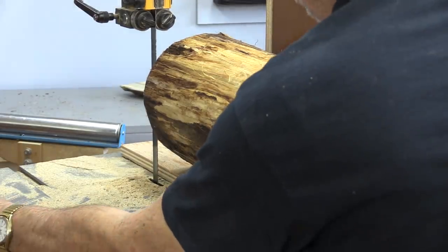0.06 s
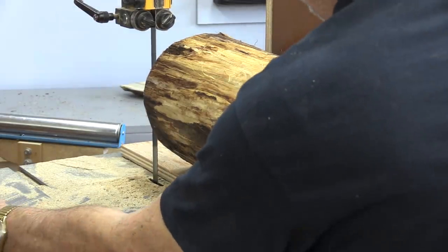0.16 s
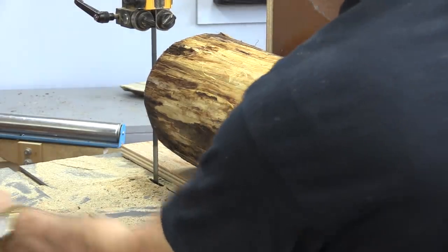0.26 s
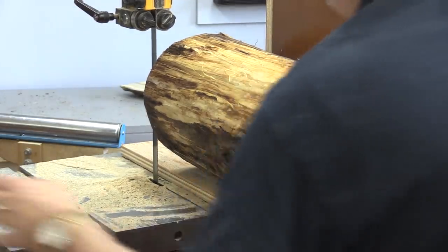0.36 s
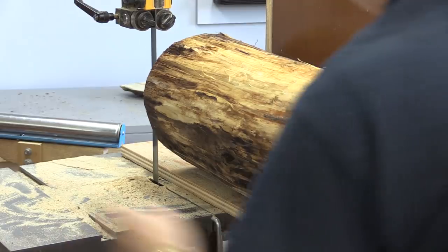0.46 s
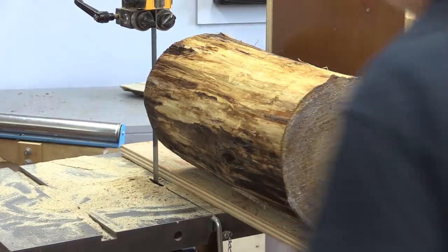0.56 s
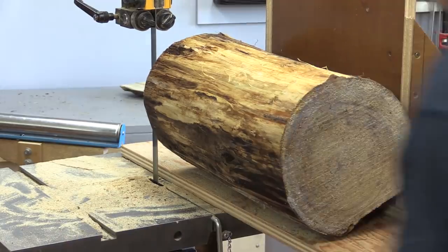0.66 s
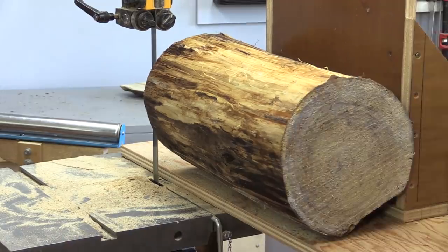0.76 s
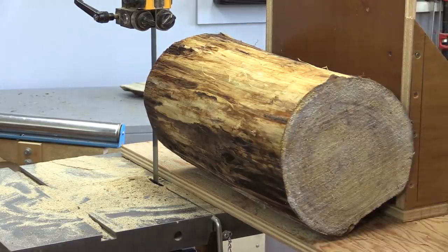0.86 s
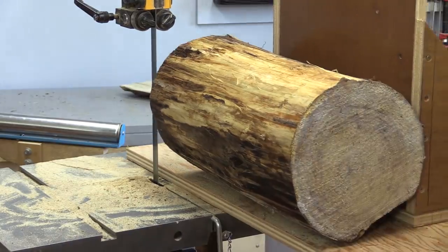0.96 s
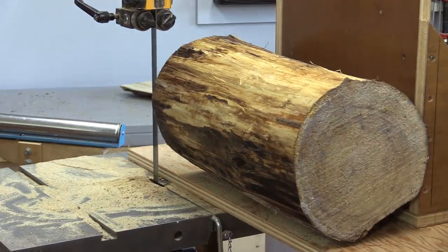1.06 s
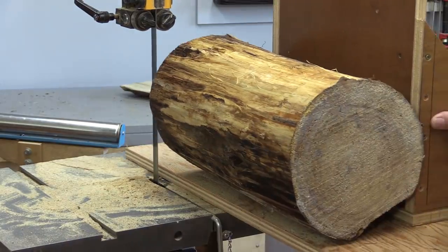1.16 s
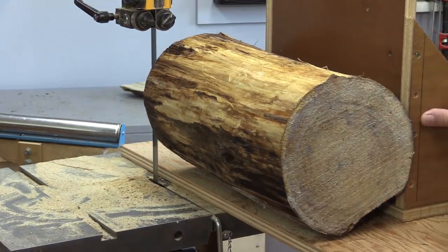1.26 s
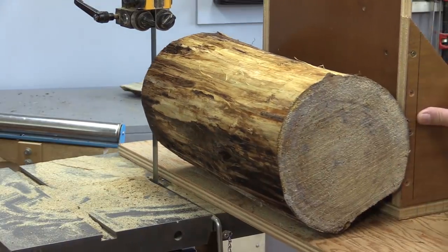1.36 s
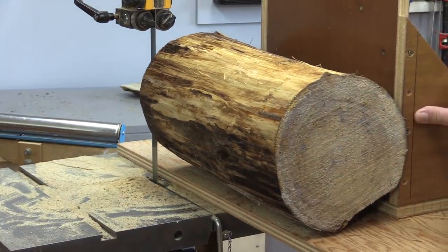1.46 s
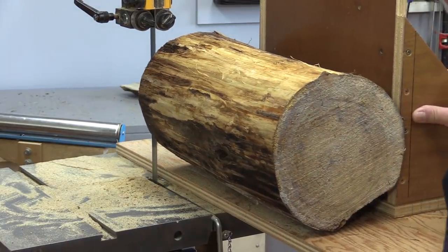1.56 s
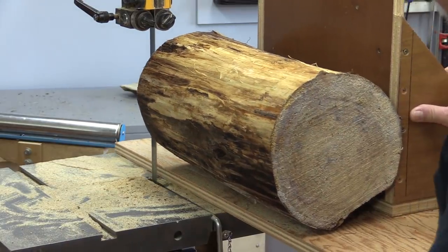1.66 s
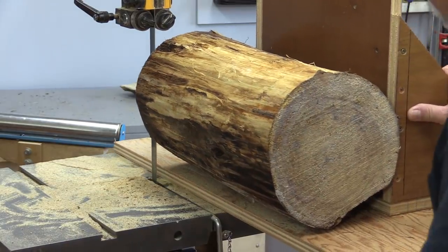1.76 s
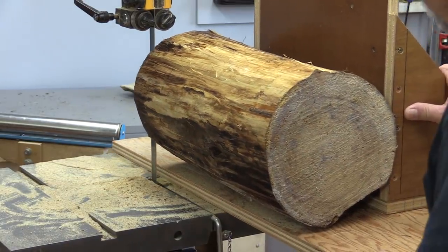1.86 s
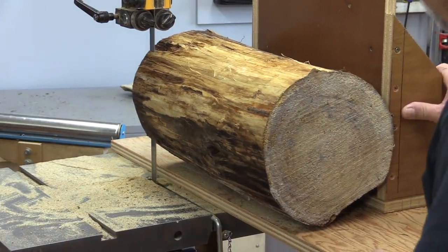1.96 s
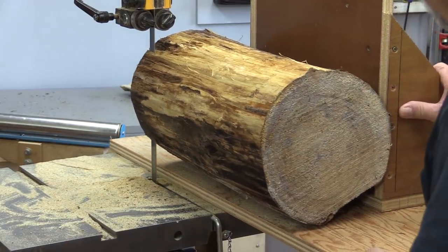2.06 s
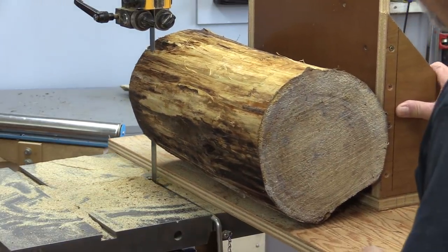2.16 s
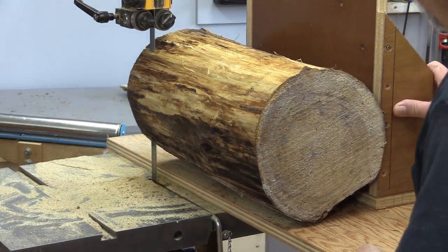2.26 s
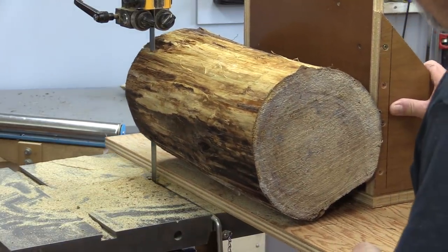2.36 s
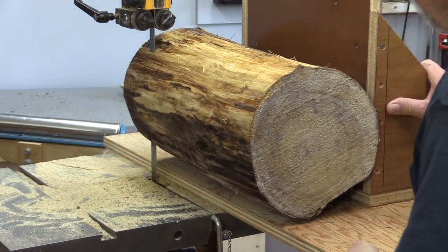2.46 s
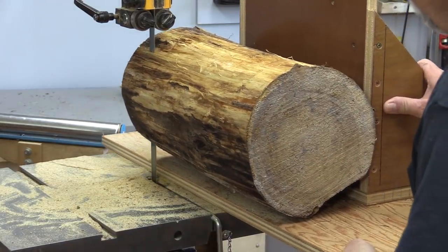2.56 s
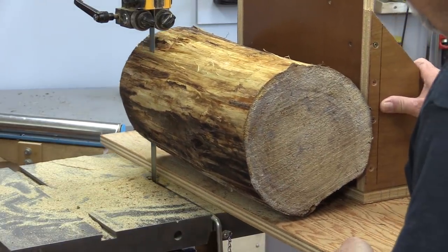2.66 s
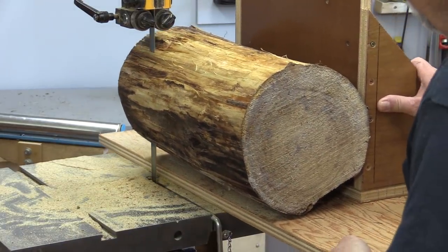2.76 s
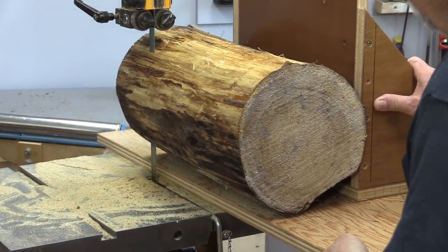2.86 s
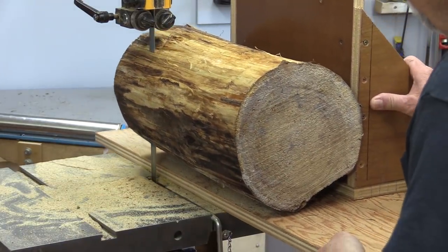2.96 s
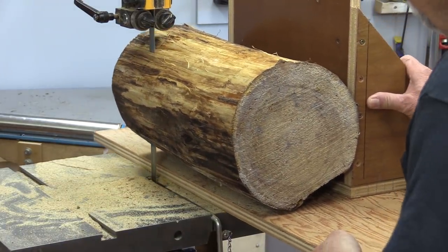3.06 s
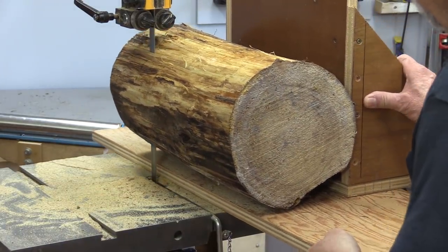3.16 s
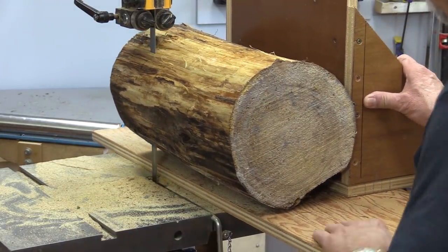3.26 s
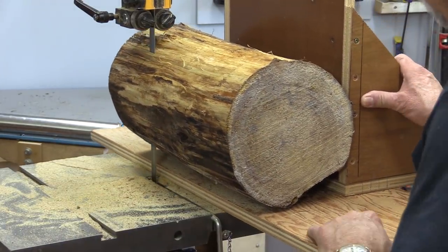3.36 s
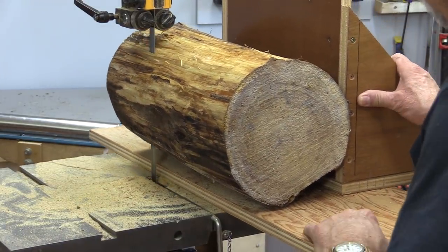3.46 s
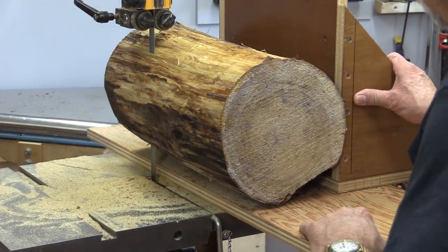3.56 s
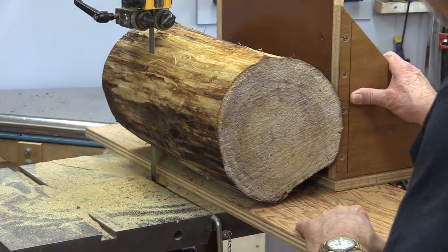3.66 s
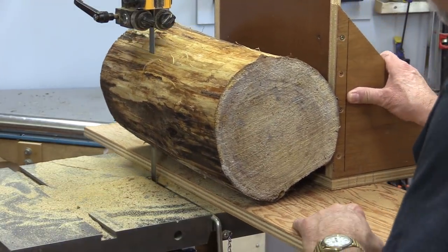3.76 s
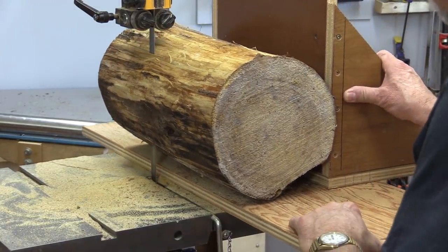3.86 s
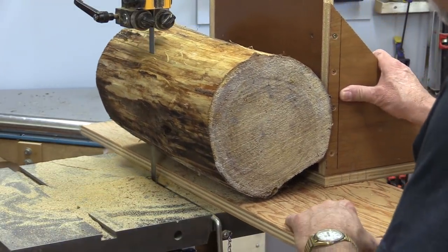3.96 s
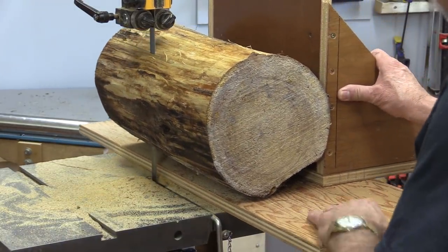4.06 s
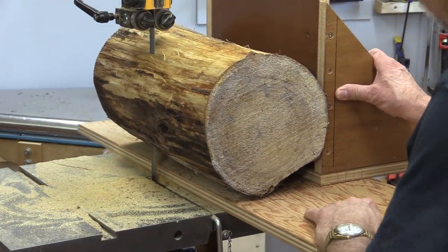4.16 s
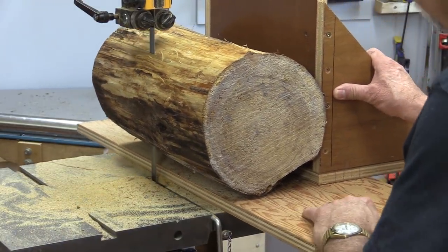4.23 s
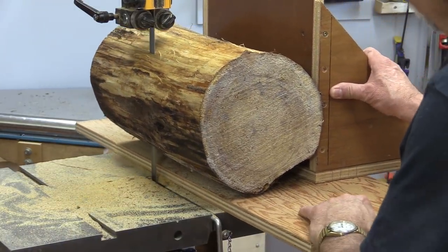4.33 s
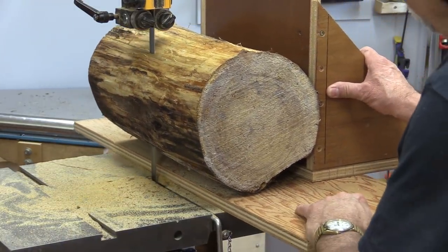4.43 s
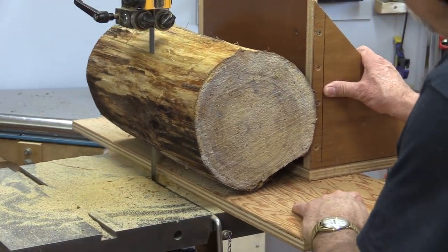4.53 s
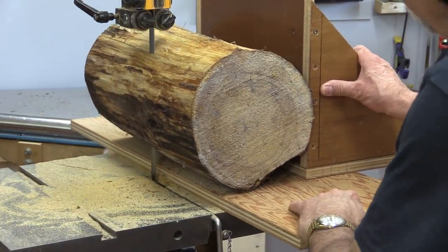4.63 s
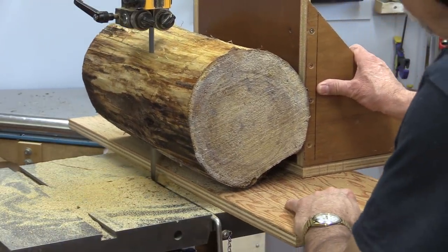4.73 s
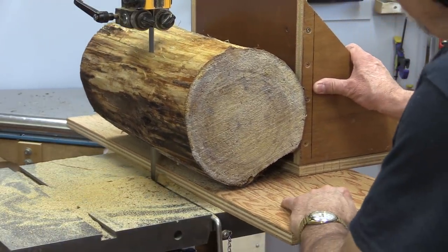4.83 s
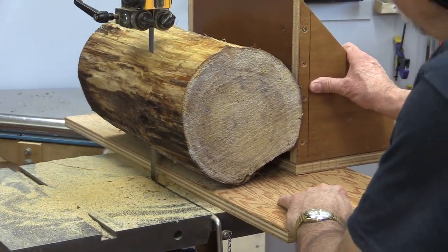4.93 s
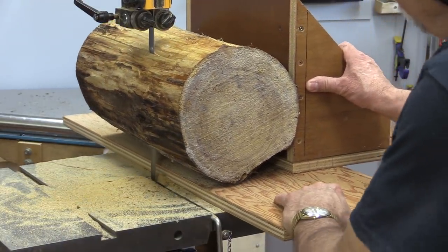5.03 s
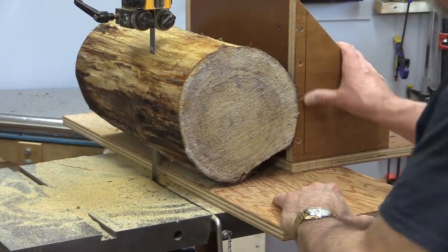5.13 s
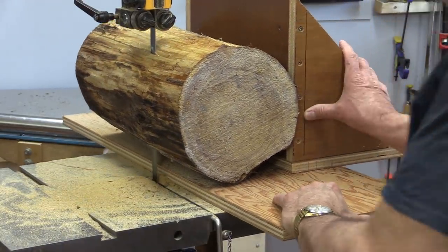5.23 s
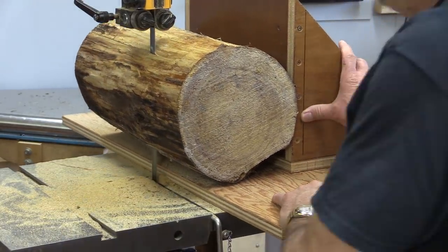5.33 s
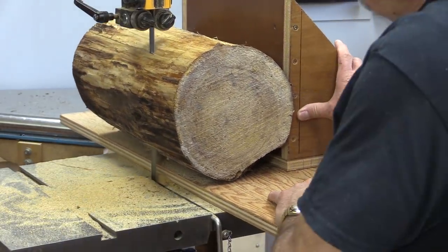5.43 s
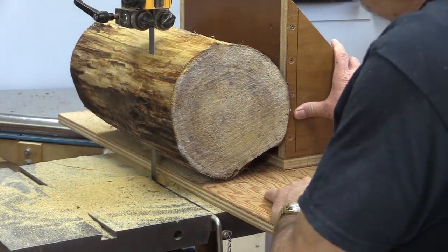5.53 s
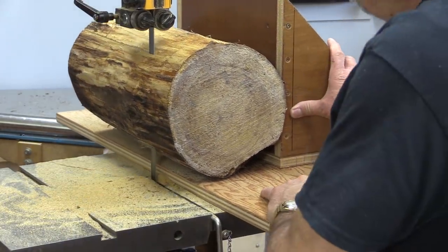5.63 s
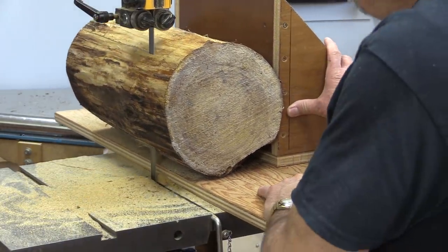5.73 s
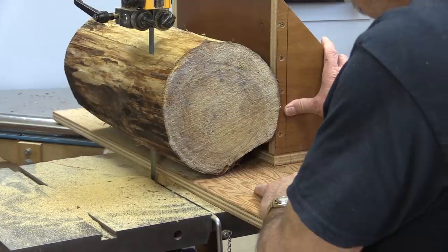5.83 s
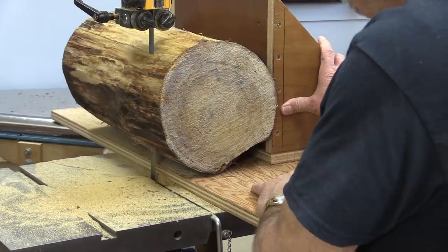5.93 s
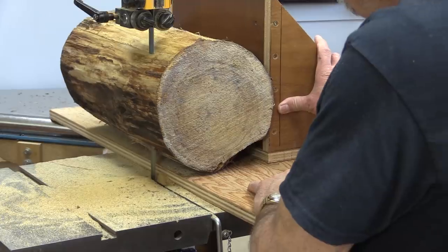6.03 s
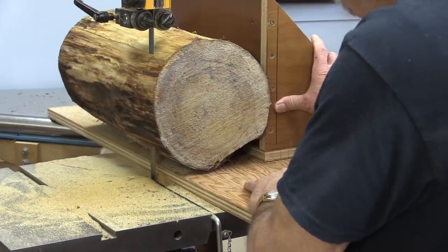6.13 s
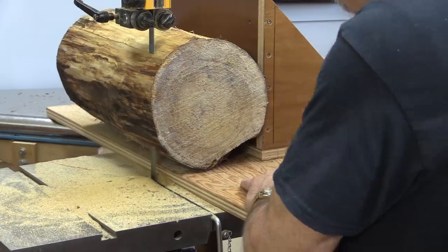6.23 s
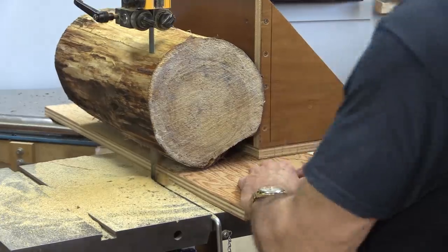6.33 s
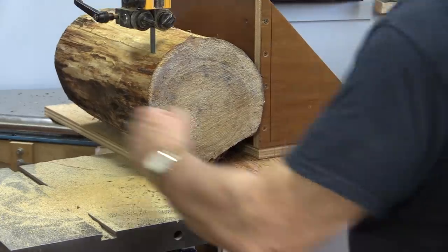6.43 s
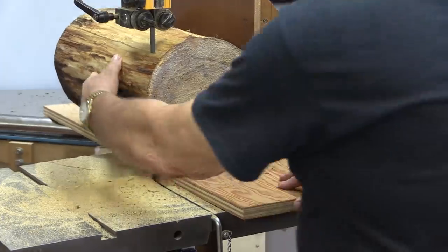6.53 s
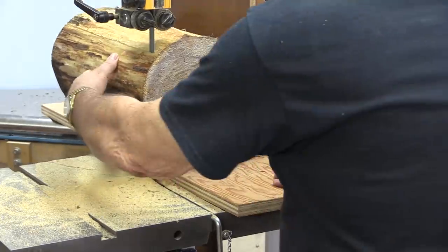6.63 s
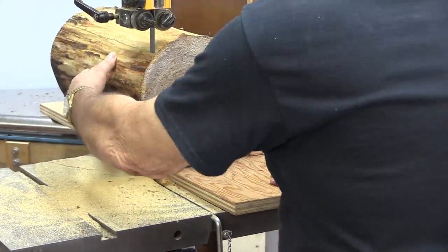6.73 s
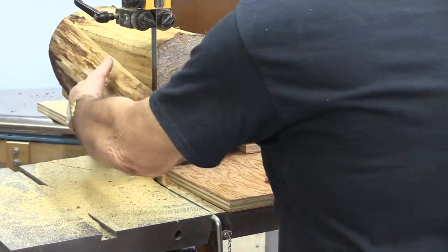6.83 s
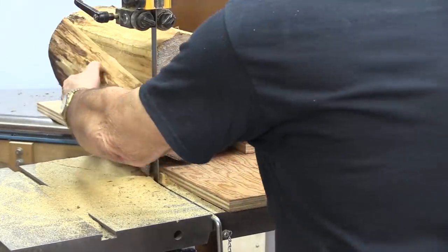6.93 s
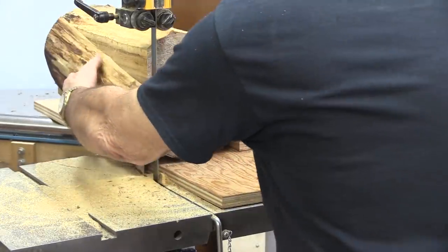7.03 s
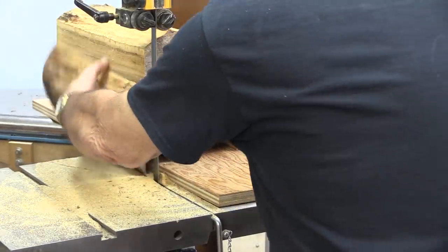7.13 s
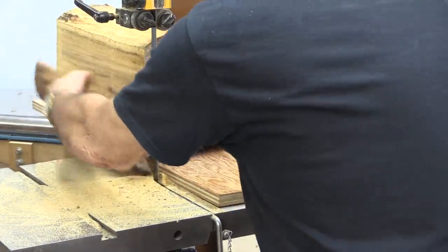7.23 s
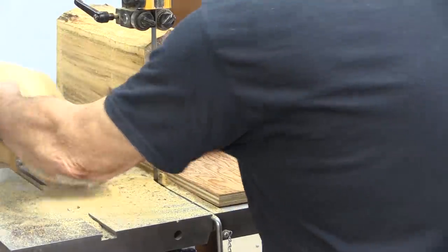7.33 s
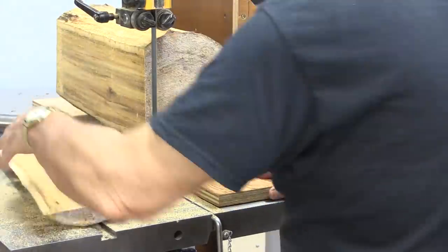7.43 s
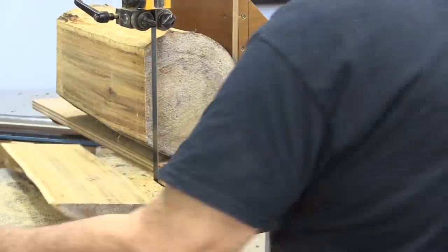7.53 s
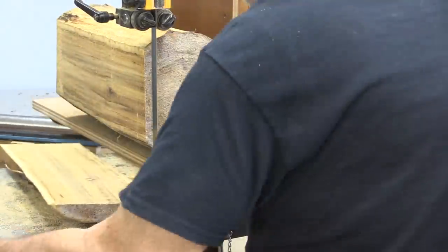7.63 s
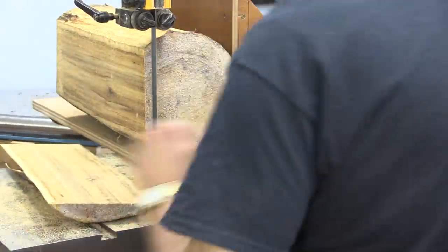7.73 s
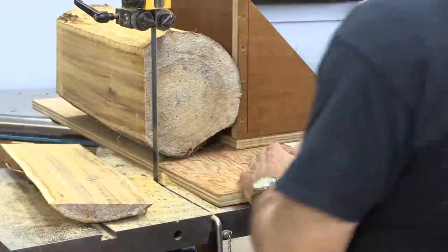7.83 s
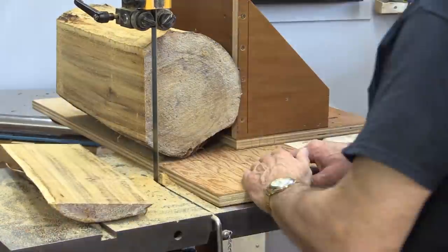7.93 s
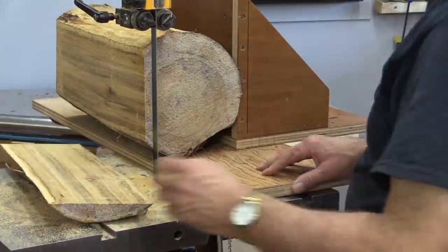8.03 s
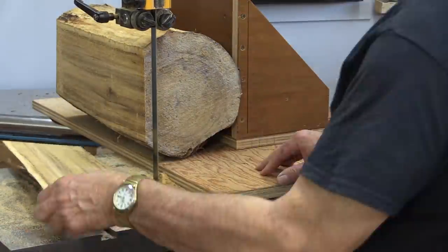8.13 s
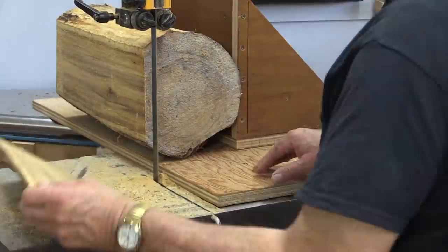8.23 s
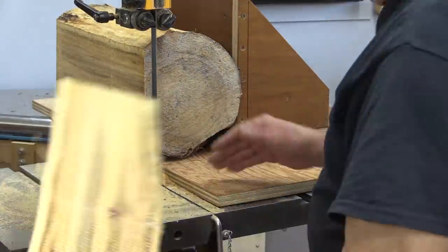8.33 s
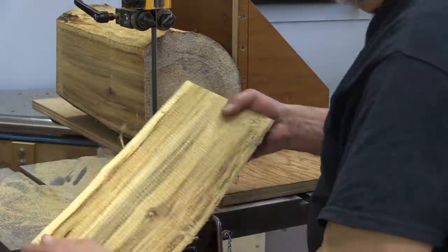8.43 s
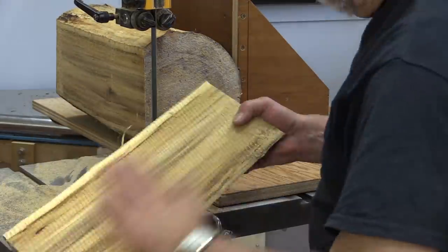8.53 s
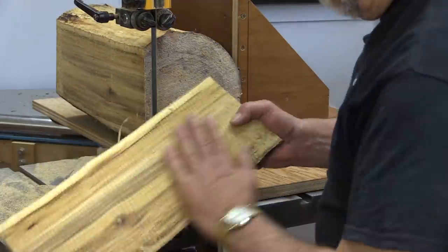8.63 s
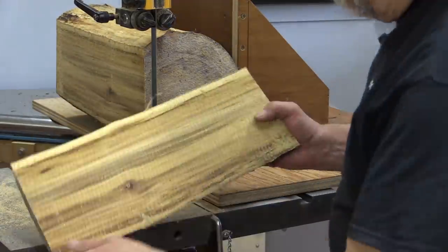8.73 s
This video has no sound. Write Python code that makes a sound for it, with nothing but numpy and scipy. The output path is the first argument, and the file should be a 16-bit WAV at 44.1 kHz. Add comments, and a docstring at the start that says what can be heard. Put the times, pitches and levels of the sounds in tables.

```python
"""A bandsaw rips a slab off a wet log in a small workshop, heard at one point over an extractor's whine.
At first the shop is dull and boomy as the log's sled scrapes up; then the sound turns abruptly thin and bright.
Five pushes: filtered noise pulsed by the teeth hisses, a shaken blade mode chatters, the motor whine sags;
when the hands ease off, partials on one shaky pitch shriek. The blade breaks out and runs free,
then the saw is switched off with a click, a short resonant burst, and its whine coasts down."""
import sys
import numpy as np
from scipy import signal
from scipy.fft import rfft, irfft, next_fast_len
from scipy.io import wavfile
from scipy.ndimage import map_coordinates

SR = 44100
rng = np.random.default_rng(int(sys.argv[2]) if len(sys.argv) > 2 else 0)


def wrap_up_sound(samples):
    """Save the sound to the file named by the first command line argument, as 16-bit audio."""
    columns = np.atleast_2d(samples).T
    # keep every value between -1 and 1, then stretch to whole-number steps
    tamed = np.clip(columns, -1, 1)
    steps = np.round(tamed * 32767).astype(np.int16)
    wavfile.write(sys.argv[1], SR, steps)


N = 387638  # length in samples

# the blade meets the slanted end of the log, takes its full depth, and breaks out (s)
ENTER_S, DEEP_S, THROUGH_S = 1.36, 2.16, 6.875
# the sound turns bright, and the saw is switched off (s)
BRIGHT_AT_S, SWITCH_OFF_S = .996, 7.69
TOOTH_HZ = 330.6  # teeth passing each second
WHEEL_HZ = 9.6  # the blade tension varies once per turn of the wheels

# tearing wood and chip spray, each before its floor and trim [time_s, tear_level_db, spray_level_db]
CUT_LEVELS = [(1.35, -45, -60), (1.85, -38, -44.5), (2.13, -37.5, -49), (2.2, -38, -38),
              (3.3, -41.5, -38.5), (4.3, -43, -39.5), (5.2, -42.5, -39), (6.3, -39.5, -40.5),
              (6.87, -40, -34)]
# spectrum shape of the tearing wood [frequency_hz, level_db_per_hz]
TEAR_SPECTRUM = [(500, -79), (1000, -1.5), (1600, -12), (2100, 5), (2500, 0.5), (3000, 2), (3900, 3),
                 (4800, -16.5), (6500, -3.5), (9000, -21)]
# spectrum shape of the flying chips [frequency_hz, level_db_per_hz]
SPRAY_SPECTRUM = [(3000, -47), (4900, 0), (5500, 1.5), (6400, -4), (7400, 4), (8400, 4), (9300, -1.5),
                  (10300, 1), (11500, -5), (13200, -3), (14500, -9.5), (15800, -4)]
# broad blade resonances under the teeth, before the tearing level [frequency_hz, width_hz, level_db]
BLADE_RESONANCES = [(3370, 230, 0.5), (8450, 710, -29), (9970, 230, -12.5)]
# light running lifts the wood's tearing slightly and flings more dust
EASE_TEAR_DB, EASE_SPRAY_DB = 0.5, 2


def cut(tear_trim_db=1, spray_trim_db=2.0, tear_floor_db=-48, spray_floor_db=-53, thrum_db=-70):
    """Wood tears, chips spray, the blade rasps in broad resonances, and the log thrums at the tooth rate."""
    s, tear_db, spray_db = np.transpose(CUT_LEVELS)
    in_wood = between(ENTER_S, THROUGH_S, ramp=0.019)
    eased = easing()
    tear = amp(curve(s, tear_db) + EASE_TEAR_DB * eased) * in_wood
    spray = amp(curve(s, spray_db) + EASE_SPRAY_DB * eased) * in_wood
    # the tearing and spray fade to nothing below these floors
    tear = np.sqrt(np.maximum(tear ** 2 - amp(tear_floor_db) ** 2, 0))
    spray = np.sqrt(np.maximum(spray ** 2 - amp(spray_floor_db) ** 2, 0))
    rasp = sum(amp(db) * resonate(teeth(), hz, width) for hz, width, db in BLADE_RESONANCES)
    rasp = rasp * between(DEEP_S, THROUGH_S)
    wood = amp(tear_trim_db) * colour(teeth(), TEAR_SPECTRUM) + rasp
    chips = amp(spray_trim_db) * colour(teeth(), SPRAY_SPECTRUM)
    thrum = amp(thrum_db) * resonate(noise(), TOOTH_HZ, width=35) * between(3.2, THROUGH_S)
    return tear * wood + spray * chips + thrum


def teeth(bite=0.14, grain_db=0.3, flutter_db=1.17):
    """Noise of breaking fibres: a pulse for every tooth, uneven from chip to chip."""
    tooth_hz = TOOTH_HZ * (1 + .012 * drift(5))
    pulse = 1 + bite * np.cos(turns(tooth_hz))
    return noise() * pulse * amp(grain_db * drift(600) + flutter_db * drift(25))


# the teeth lose their bite for an instant [centre_s, length_s, level_db]
SLIPS = [(3.06, .1, -4.5), (4.1, .16, -3.5), (5.42, .075, -10), (6.603, .075, -10)]


def bite_slips():
    """Brief dips in the level as the teeth lose their bite."""
    return amp(sum(db * arch(s, length) for s, length, db in SLIPS))


# slowly changing squeal of the blade beneath the shrieks, before partial trims
# [time_s, first_level_db, second_level_db, third_level_db]
SLOW_SQUEAL = [(1.37, -60, -64, -51.5), (2.14, -57, -66, -42), (2.2, -57, -48, -36), (3.0, -45, -47, -41),
               (3.8, -38.5, -50, -45), (4.7, -39.5, -41.5, -38), (5.15, -41.5, -60, -44),
               (5.5, -33.5, -47.5, -41.5), (6.87, -43.5, -40, -47)]
# the squeal swells into shrieks, before partial trims
# [centre_s, length_s, first_level_db, second_level_db, third_level_db]
SHRIEKS = [(2.213, 0.2, -52, -39, -32), (3.326, 0.87, -50, -49, -37.5), (4.036, 0.41, -53, -36, -55),
           (4.21, 0.21, -35.5, -36.5, -53), (4.465, 0.33, -46, -37, -48), (5.29, 0.32, -33.5, -34.5, -35.5),
           (5.663, 0.31, -37, -35, -56), (6.485, 0.36, -49, -37.5, -41), (6.808, 0.18, -29.5, -41, -43)]
# pitch of the squeal running free, and its fall at a load of 1
SQUEAL_HZ, SQUEAL_SAG_HZ = 2738, 77


def squeal(flutter_db=3, trims_db=(-1.5, -3, -2, -12, -15), halo_db=-12.5, halo_step_db=3.0, halo_hz=150,
           fourth_flare_db=1.5, jitter=0.001286, throb_db=0.5):
    """Stick and slip of the blade on wet wood: five partials on one shaky pitch, the top ones moving together."""
    s, *slow = np.transpose(SLOW_SQUEAL)
    power = np.array([level(s, db) ** 2 for db in slow])
    for s, length, *db in SHRIEKS:
        power = power + amp(db)[:, None] ** 2 * arch(s, length) ** 2
    first, second, third = np.sqrt(power)
    # shrillest as the blade first takes the full depth
    fourth = third * amp(fourth_flare_db * between(DEEP_S, 3))
    gains = (first, second, third, fourth, third)
    hz = SQUEAL_HZ - SQUEAL_SAG_HZ * load()
    phase = turns(hz * (1 + jitter * drift(80) + .0008 * drift(8)))
    out = np.zeros(N)
    for k, (gain, trim_db) in enumerate(zip(gains, trims_db), 1):
        flutter = evened(amp(flutter_db * np.sqrt(k / 3) * drift(20)))  # higher partials break up more
        line = np.sqrt(2) * np.sin(k * phase) * flutter
        halo = amp(halo_db + halo_step_db * k) * resonate(noise(), k * hz, width=halo_hz)
        out += (line + halo) * gain * amp(trim_db)
    return out * amp(throb_db * tone(WHEEL_HZ))


# pitch of the chatter while the hands push [time_s, pitch_hz]
CHATTER_PITCH = [(1.5, 2180), (2, 2540), (2.17, 2250), (6.56, 2245), (6.595, 2380), (6.625, 2310),
                 (6.64, 2210)]
CHATTER_EASE_HZ = 80  # the chatter rises by this much while the blade runs light
# the skid's partials 1 and 2 [level_db]
SKID_LEVELS = (-37, -32)
SKID_AT_S, SKID_LENGTH_S = 6.612, .06  # the blade skids as it bites for the last push
# a higher blade mode sings briefly, before its trim [time_s, level_db]
SING_LEVEL = [(3.55, -66), (3.75, -41), (3.92, -36), (4.08, -48), (4.7, -47), (5.4, -64)]
SING_HZ = 5655


def chatter(trim_db=-2, lock_db=-35, lock_range_db=3, octave_db=-16, sing_trim_db=-1, shake=0.00608,
            wander=.004):
    """A blade mode shaken by the teeth; when driven hard it locks into a rough tone."""
    db = chatter_db_curve()
    hz = curve(*np.transpose(CHATTER_PITCH)) + CHATTER_EASE_HZ * easing()
    hz = hz * (1 + wander * drift(6))
    locked = 1 / (1 + np.exp((lock_db - db) / lock_range_db))
    shaken = resonate(teeth(), hz, width=260)
    shaky_hz = hz * (1 + shake * drift(70))
    swing = evened(np.tanh(amp(4.1 * drift(40))))  # the kerf limits how far the blade can swing
    ringing = (tone(shaky_hz) + amp(octave_db) * tone(2 * shaky_hz)) * swing
    low_mode = (np.sqrt(1 - locked) * shaken + np.sqrt(locked) * ringing) * amp(db + trim_db)
    skid = sum(amp(skid_db) * tone(k * shaky_hz) for k, skid_db in enumerate(SKID_LEVELS, 1))
    skid = skid * arch(SKID_AT_S, SKID_LENGTH_S)
    s, sing_db = np.transpose(SING_LEVEL)
    sing = resonate(teeth(), SING_HZ, width=32) * level(s, sing_db + sing_trim_db)
    return low_mode + skid + sing


# bouts of chatter as the log is pushed, before the chatter trim
# [start_s, end_s, first_level_db, last_level_db]
CHATTER_BOUTS = [(2.17, 3.304, -38, -32), (3.398, 4.158, -33, -35), (4.225, 4.8, -34.5, -29.5),
                 (5.422, 6.502, -35.5, -35), (6.63, 6.68, -24, -25.5), (6.69, 6.866, -31, -20.5)]
CHATTER_REST_DB, CHATTER_RAMP_S = -40, 0.028  # rest level at a load of 1; rise and fall of the bouts


def chatter_db_curve(throb_db=0.1):
    """Level of the chatter: a rest level that follows the load, bouts on the pushes, a throb from the wheels."""
    rest = amp(CHATTER_REST_DB) * load()
    bouts = sum(amp(curve([start, end], [first, last])) * between(start, end, CHATTER_RAMP_S)
                for start, end, first, last in CHATTER_BOUTS)
    return 20 * np.log10(np.maximum(rest, bouts) + 1e-9) + throb_db * tone(WHEEL_HZ)


# short bright ticks and rasps: teeth catching wood on entry, later the slab brushing the blade
# and handling; before the trim [start_s, level_db]
TICKS = [(1.9185, -18), (1.9306, -20), (1.9616, -18), (2.0103, -19), (2.0991, -19.5), (7.2883, -24),
         (7.3103, -22.5), (7.3537, -32), (7.4759, -26), (7.7174, -38), (7.9848, -30.5)]


def ticks_and_rasps(trim_db=-10, t60=0.053, attack=0.0008):
    """Short bright bursts of noise, from teeth catching wood, the slab brushing the blade and handling."""
    t, envelope = np.arange(SR // 4) / SR, np.zeros(N)
    for s, db in TICKS:
        add(envelope, s, amp(db + trim_db - 60 * t / t60) * (1 - np.exp(-t / attack)))
    spectrum = [(1000, -30), (2500, 2), (5000, -8), (8000, 6), (13500, -2), (15800, -9)]  # Hz, dB per Hz
    return envelope * colour(teeth(), spectrum)


# the hands ease off between pushes [start_s, end_s]
EASES = [(3.27, 3.44), (4.15, 4.26), (5.19, 5.41), (6.47, 6.61)]


def easing():
    """1 while the hands ease off, 0 while they push."""
    return sum(between(start, end, ramp=0.098) for start, end in EASES)


# load on the motor (0 running free, 1 feeding hard): on entering, just short of full depth,
# at full depth, deep in the kerf
LOAD_TOUCH, LOAD_SLANT, LOAD_DEEP, LOAD_BOUND = .13, .72, .75, 1.08
BIND_S = 1.7  # time constant of the kerf tightening on the blade
EASE_LOAD_DROP = .56  # the share of the load that falls away as the hands ease off


def load():
    """The load grows with the depth of the cut, then as the kerf binds, and falls as the hands ease off."""
    t = np.arange(N) / SR
    entering = curve([ENTER_S, DEEP_S], [LOAD_TOUCH, LOAD_SLANT])
    binding = LOAD_BOUND + (LOAD_DEEP - LOAD_BOUND) * np.exp((DEEP_S - t) / BIND_S)
    pushed = np.where(t < DEEP_S, entering, binding)
    return pushed * (1 - EASE_LOAD_DROP * easing()) * between(ENTER_S, THROUGH_S, ramp=0.14)


# magnetic hum, before the motor loudness [frequency_hz, level_db]
HUM = [(479, -73.5), (959, -55)]
# rotor slot whine and its sidebands, counted from the whine [step_count]
SLOT_STEPS = [-1, 0, 1, 2, 3]
# one for each of those steps, before the motor loudness [level_db]
SLOT_LEVELS = [-56.5, -52, -63.5, -74, -60]
# loudness added to whine and hum [time_s, whine_level_db, hum_level_db]
MOTOR_LOUDNESS = [(1, 2, -5), (1.2, -6, 5), (1.8, 4.5, 4), (2.5, 5, 3.5), (3.4, 0, 2), (6.1, -2.5, 3.5),
                  (6.55, 6.5, 6.5), (7.73, 1.5, 7.5), (7.9, -13, 0.5)]
# spin-up and coasting [time_s, share_of_idle_speed]
SPEED = [(1, .95), (1.12, 1), (7.68, 1), (7.75, .958), (8, .85)]
# slot whine running free, its fall at a load of 1, and the spacing of its sidebands
SLOT_HZ, SLOT_SAG_HZ, SLOT_STEP_HZ = 4552, 55, 479


def motor(unsteady=0.06):
    """Hum and sidebands last while current flows; the slot whine follows the rotor, sagging, then coasting."""
    s, whine_db, hum_db = np.transpose(MOTOR_LOUDNESS)
    current = between(0, SWITCH_OFF_S)
    hum = sum(amp(db) * tone(hz, waver=0.13) for hz, db in HUM) * current
    speed = curve(*np.transpose(SPEED))
    speed = speed + unsteady * (1 - speed) * drift(150)  # the rotor shudders while off its running speed
    slot_hz = SLOT_HZ * speed - SLOT_SAG_HZ * load()
    whine = np.zeros(N)
    for k, db in zip(SLOT_STEPS, SLOT_LEVELS):
        line = amp(db) * tone(slot_hz + k * SLOT_STEP_HZ)
        whine += line * (current if k else 1)  # step 0 is the whine itself and outlasts the current
    return hum * level(s, hum_db) + whine * level(s, whine_db)


def spin_up(hz=4410, width_hz=200, level_db=-46, end_s=1.095):
    """A short rough whine from the drive as the blade comes up to speed: noise in one resonance."""
    return amp(level_db) * resonate(noise(), hz, width_hz) * between(BRIGHT_AT_S, end_s)


# a wooden knock, a short scrape in a high and a lower band, and the switch
# [start_s, peak_level_db, centre_hz, t60_s, sharpness_q]
KNOCKS = [(0.1087, -20.5, 1380, 0.073, 1.6), (.802, -42.5, 9300, 0.14, 6), (.808, -35.5, 3500, 0.32, 3.2),
          (7.6755, -16.5, 5100, 0.023, 1.7)]


def knocks(tail_db=-16, room_t60=0.37):
    """Knock, scrape bands and switch: each a short burst in one broad resonance, followed by the room."""
    t, out = np.arange(SR // 3) / SR, np.zeros(N)
    for s, db, hz, t60, sharpness in KNOCKS:
        decay = amp(-60 * t / t60) + amp(tail_db - 60 * t / room_t60)
        burst = rng.standard_normal(len(t)) * decay
        ring = signal.lfilter(*signal.iirpeak(hz, sharpness, SR), burst)
        add(out, s, amp(db) * ring / abs(ring).max())
    return out


# spectrum shape of rushing air and running wheels [frequency_hz, level_db_per_hz]
AIR_SPECTRUM = [(180, -32), (300, -42), (400, -22.5), (470, -10), (640, -12.5), (850, 0.5), (1300, -2.5),
                (2250, 3), (3000, -3.5), (4900, -7), (6000, -8), (10000, -11.5), (15500, -22)]
# its mean level, which flickers [time_s, level_db]
AIR_LEVEL = [(1, -42), (7.6, -40), (7.9, -41.5), (8.79, -42)]
# hollows of the housing [frequency_hz, width_hz, level_db]
HOUSING = [(329, 48, -77.5), (534, 73, -64.5), (825.3, 15, -60), (951, 30, -56.5), (1647, 15, -55),
           (2117, 85, -52.5)]
# lasting tones of the extractor fan [multiple_of_fan_pitch, level_db]
FAN_TONES = [(1, -74), (2, -65.5), (3, -64), (13, -64), (18, -56), (20, -62)]
# two fan tones that swell and fade, before their trims [time_s, sixth_level_db, twelfth_level_db]
FAN_WHINE = [(1, -56.5, -44.5), (2, -55.5, -41.5), (4, -55.5, -44), (6.3, -52.5, -53), (7.1, -46.5, -51.5),
             (7.8, -54, -49.5), (8, -46.5, -49), (8.4, -51.5, -51.5), (8.79, -53, -45)]
FAN_HZ = 236.8


def extractor(sixth_trim_db=-1, twelfth_trim_db=0):
    """Air rushes through hollow housings under the tones of the fan."""
    air = colour(noise(), AIR_SPECTRUM) * amp(curve(*np.transpose(AIR_LEVEL)) + 1.1 * drift(14))
    hollows = sum(amp(db) * resonate(noise(), hz, width) for hz, width, db in HOUSING)
    hz = FAN_HZ * (1 + 0.00026 * drift(2))
    s, sixth_db, twelfth_db = np.transpose(FAN_WHINE)
    sixth = amp(curve(s, sixth_db) + sixth_trim_db) * tone(6 * hz)
    twelfth = amp(curve(s, twelfth_db) + twelfth_trim_db) * tone(12 * hz)
    lasting = sum(amp(db) * tone(round(k) * hz, waver=0.11) for k, db in FAN_TONES)
    return air + hollows + sixth + twelfth + lasting


# spectrum shape of the boomy opening [frequency_hz, level_db_per_hz]
RUMBLE_SPECTRUM = [(45, -38), (96, -29), (120, -21), (262, -9), (470, -11), (660, -6), (900, -15.5),
                   (1400, -16), (2000, -20.5), (3500, -28.5), (6000, -38.5), (9000, -40.5), (15500, -52)]
# its level, before the trim [time_s, level_db]
RUMBLE_LEVEL = [(0.0, -42.5), (0.918, -41.5), (0.98, -39.5)]
# fan tones in the dull opening [frequency_hz, level_db]
DULL_TONES = [(118.4, -62.5), (355.3, -55.5), (673, -62), (710.6, -43.5), (1066, -53.5)]
# the log's sled scrapes over the table, before the trim [time_s, resonance_hz, level_db]
SLED = [(.48, 596, -51), (.56, 663, -40.5), (.76, 660, -51), (.82, 940, -39), (.9, 1050, -41.5),
        (.99, 1110, -51)]
# the sled judders as it is pushed up [centre_s, length_s, level_db]
JUDDERS = [(.773, .022, -31), (.797, .02, -34)]
JUDDER_HZ = 664


def dull_shop(rumble_trim_db=1, sled_trim_db=-1, overtone_db=-47):
    """Boomy fan noise and tones, with the sled's scrape as noise in a moving resonance."""
    rumble_db = curve(*np.transpose(RUMBLE_LEVEL)) + rumble_trim_db
    rumble = colour(noise(), RUMBLE_SPECTRUM) * amp(rumble_db)
    fan = sum(amp(db) * tone(hz, waver=0.32) for hz, db in DULL_TONES)
    s, hz, db = np.transpose(SLED)
    scrape = resonate(noise(), curve(s, hz), width=160) * level(s, db + sled_trim_db)
    # the scrape turns briefly nasal
    overtone = amp(overtone_db) * resonate(noise(), 1444, width=120) * between(0.61, 0.81)
    judder = tone(JUDDER_HZ) * sum(amp(db) * arch(s, length) for s, length, db in JUDDERS)
    return rumble + fan + scrape + overtone + judder


def amp(db):
    """Decibels to gain."""
    return 10 ** (np.asarray(db) / 20)


def evened(x):
    """Scales to rms 1."""
    return x / np.sqrt(np.mean(x ** 2) + 1e-20)


def curve(s, values):
    """Joins timed points by straight lines."""
    return np.interp(np.arange(N) / SR, s, values)


def between(start, end, ramp=.01):
    """1 from start to end, with sloping edges."""
    return curve([start - ramp / 2, start + ramp / 2, end - ramp / 2, end + ramp / 2], [0, 1, 1, 0])


def arch(s, length):
    """A rounded swell from 0 to 1 and back, centred on s."""
    return np.cos(np.pi * np.clip((np.arange(N) / SR - s) / length, -.5, .5)) ** 2


def level(s, db):
    """A gain curve, silent outside its points."""
    return amp(curve(s, db)) * between(s[0], s[-1])


def noise():
    """White noise."""
    return rng.standard_normal(N)


def colour(x, points):
    """Gives x a spectrum of (Hz, dB) points, at rms 1."""
    hz, db = np.transpose(points)
    size = next_fast_len(N)
    f = np.fft.rfftfreq(size, 1 / SR)
    gain = amp(np.interp(np.log(f + 1), np.log(hz), db))
    return evened(irfft(rfft(x, size) * gain, size)[:N])


def drift(hz):
    """Smooth chance of rms 1 that changes about hz times a second."""
    knots = rng.standard_normal(N // 32)
    places = np.arange(0, N, 16) * 2 * hz / SR  # one value for every 16 samples
    return evened(map_coordinates(knots, [places], order=3, mode="wrap")).repeat(16)[:N]


def turns(hz):
    """Running phase of a frequency curve."""
    return 2 * np.pi * np.cumsum(hz * np.ones(N)) / SR


def tone(hz, waver=0.16):
    """A machine tone whose strength wavers."""
    return np.sqrt(2) * np.sin(turns(hz) + 2 * np.pi * rng.random()) * (1 + waver * drift(9))


def resonate(x, hz, width):
    """A gentle resonance with broad skirts that follows the curve hz, at rms 1."""
    turn = np.exp(1j * turns(hz))
    r = np.exp(-np.pi * width / SR)
    # shift the resonance to 0 Hz, filter there, and shift back
    return evened((turn * signal.lfilter([1], [1, -2 * r, r * r], x / turn)).real)


def add(mix, s, sound):
    """Mixes a sound in at time s."""
    part = mix[max(round(s * SR), 0):][:len(sound)]
    part += sound[:len(part)]


LOW_CUT_HZ = 167  # the running saw is heard without bass


def scene():
    """The dull opening gives way to the bright, bassless running saw; both channels are alike."""
    bright = between(BRIGHT_AT_S, N)
    knocking = knocks()
    cutting = bite_slips() * (cut() + squeal()) + chatter() + ticks_and_rasps()
    saw = cutting + motor() + spin_up() + knocking + extractor()
    saw = signal.sosfilt(signal.butter(8, LOW_CUT_HZ, "highpass", fs=SR, output="sos"), saw)
    mono = (1 - bright) * (dull_shop() + knocking) + bright * saw
    return np.array([mono, mono])


EDGE_HZ = 15850  # upper edge of the band


def record(dry):
    """The microphone and recorder pass nothing much above the upper band edge."""
    low_pass = signal.firwin(511, EDGE_HZ, window=("kaiser", 9), fs=SR)
    return signal.oaconvolve(dry, low_pass[None], "same")


dry = scene()
out = record(dry)
wrap_up_sound(out)
```